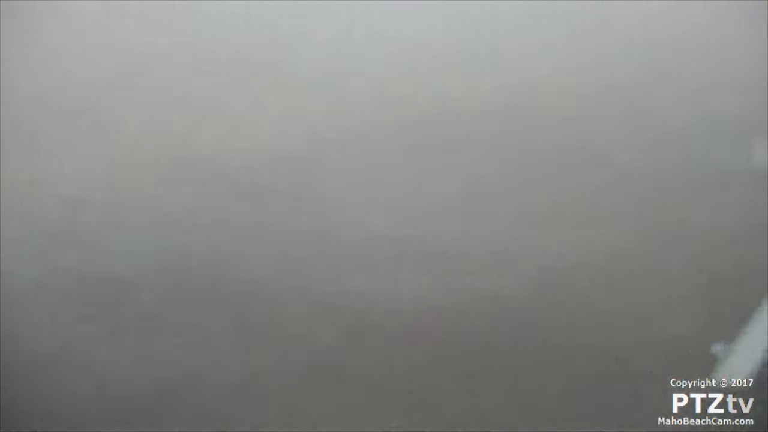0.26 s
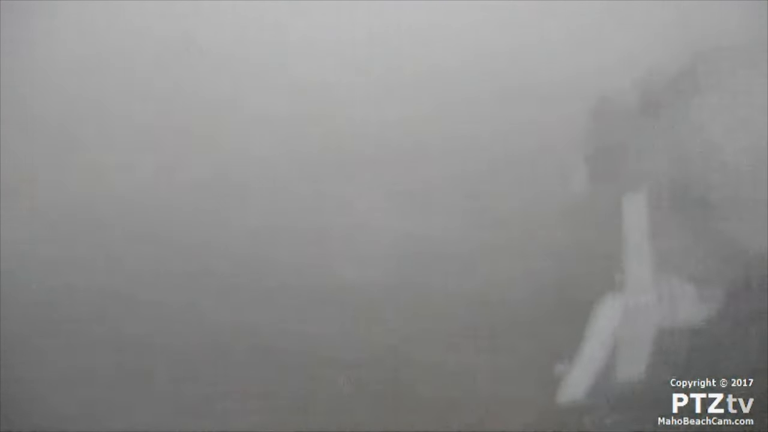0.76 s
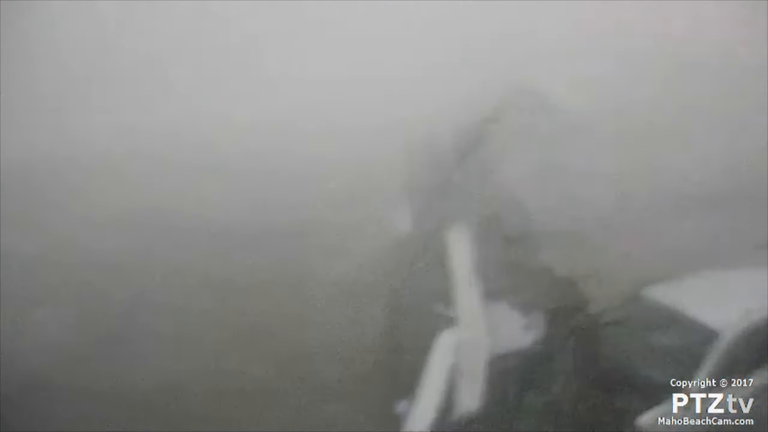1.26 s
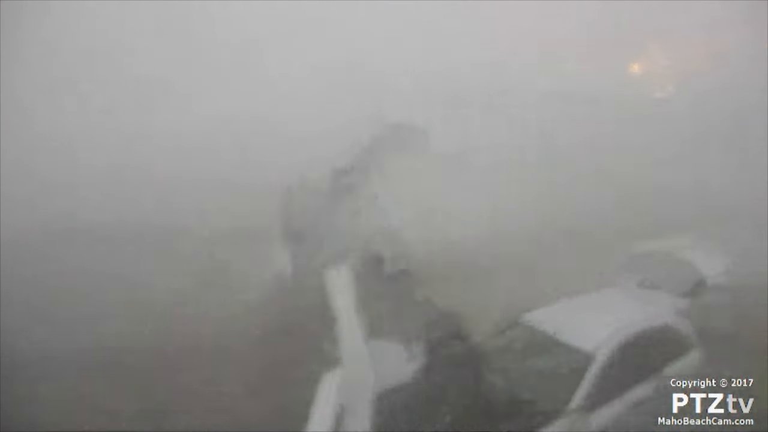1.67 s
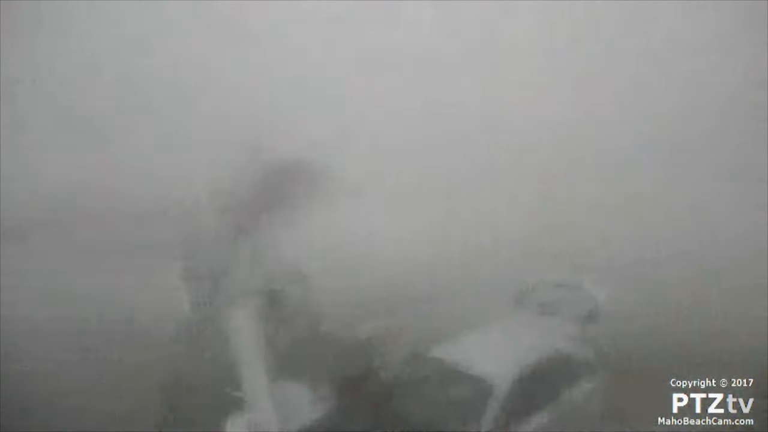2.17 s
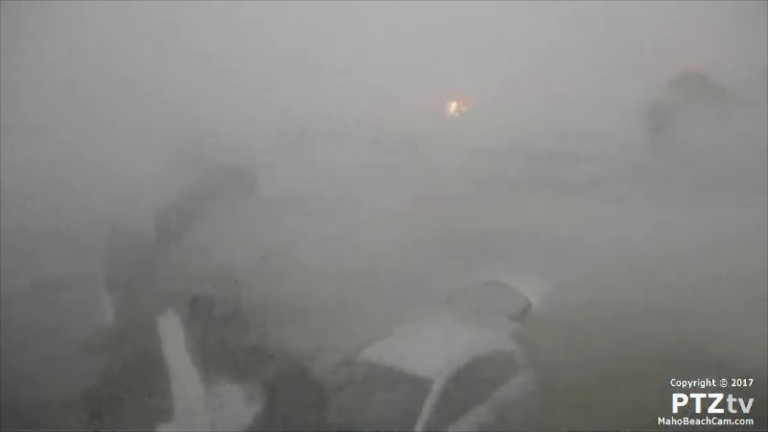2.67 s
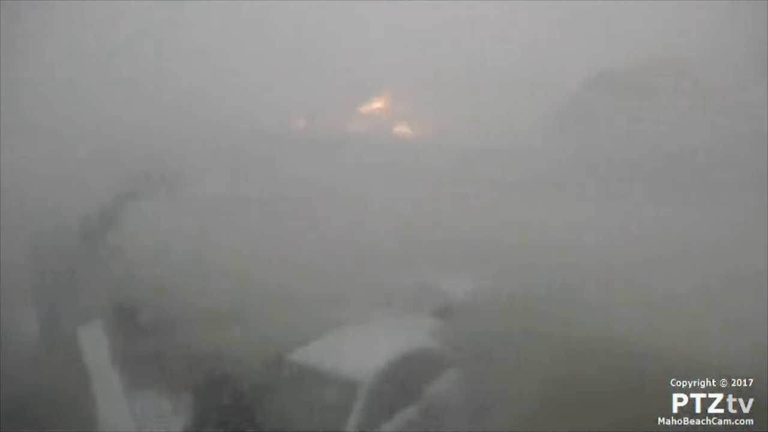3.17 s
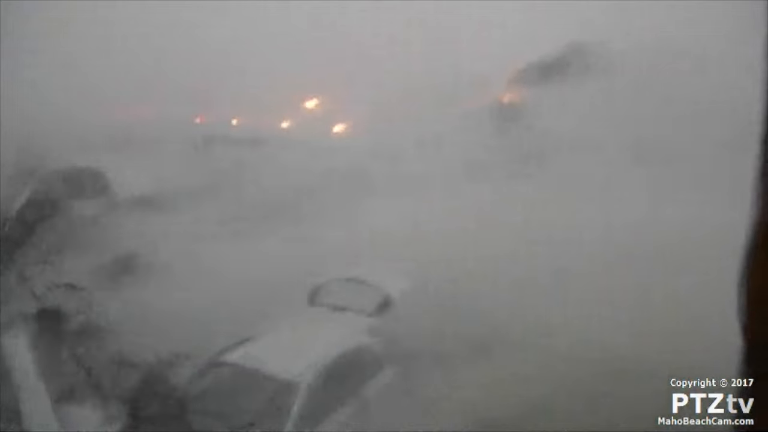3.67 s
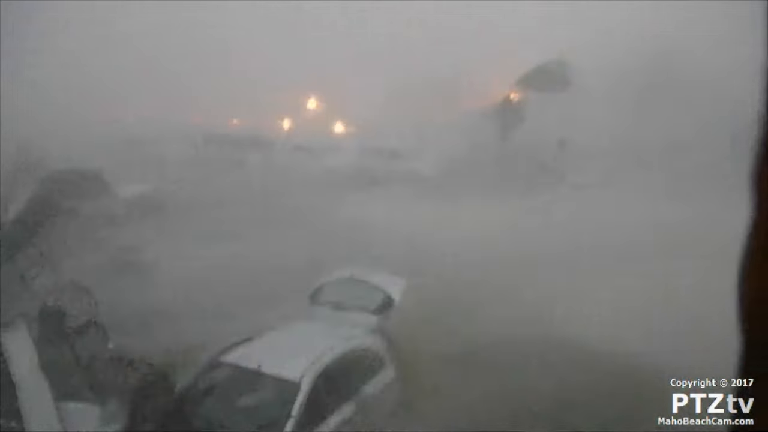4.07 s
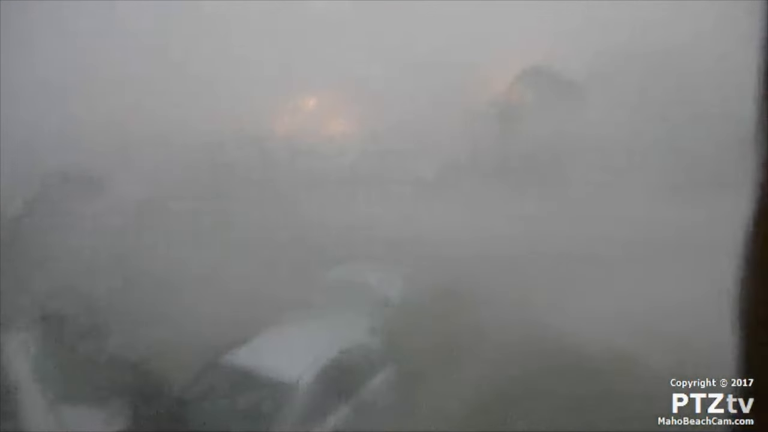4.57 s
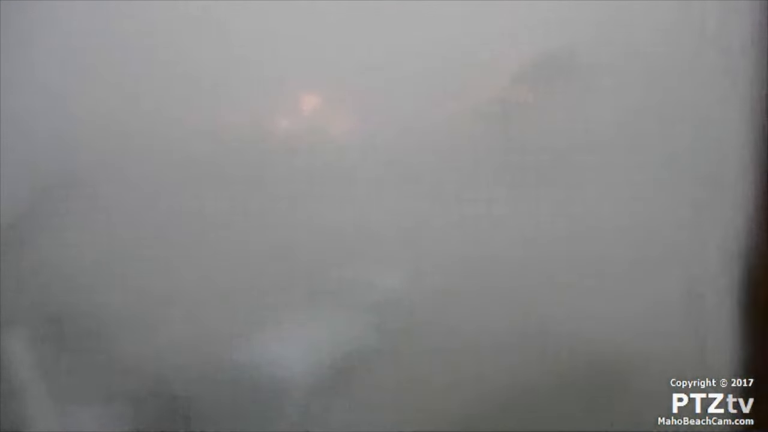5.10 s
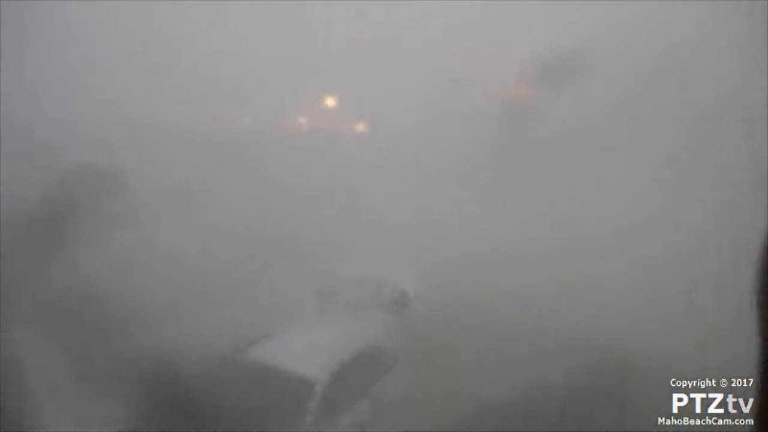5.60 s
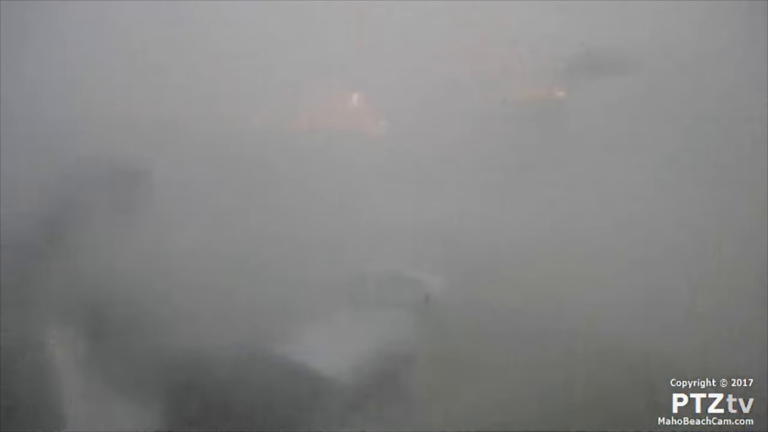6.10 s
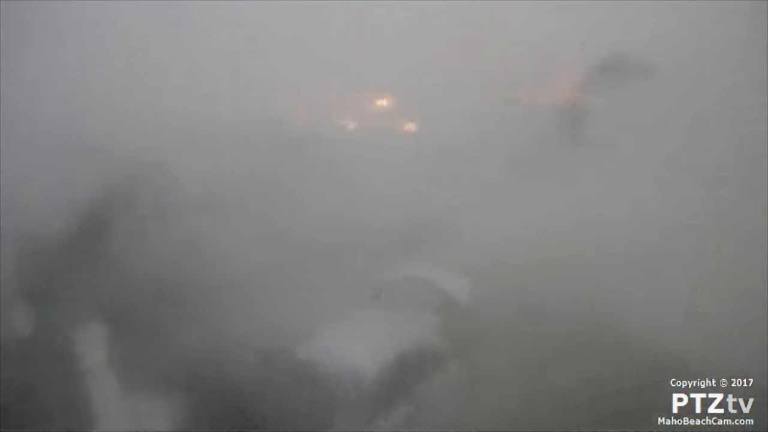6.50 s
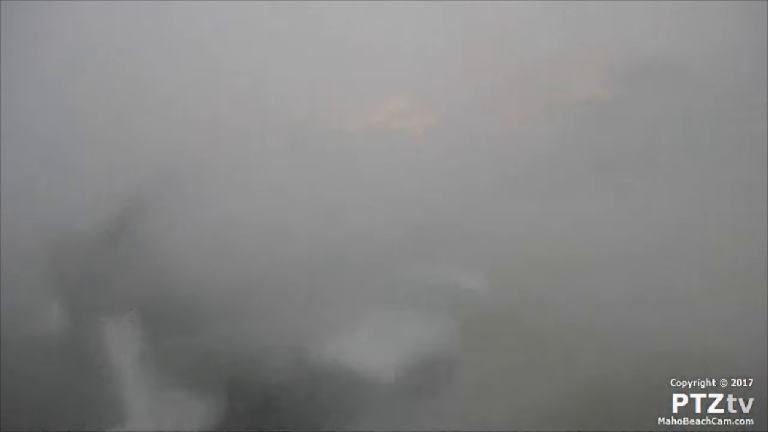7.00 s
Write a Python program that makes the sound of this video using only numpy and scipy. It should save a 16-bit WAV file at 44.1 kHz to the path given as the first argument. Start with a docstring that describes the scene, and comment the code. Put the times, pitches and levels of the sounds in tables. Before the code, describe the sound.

Violent storm gale batters a camera's microphone: low thudding rumble, a shifting hollow howl, hissing sheets of spray and fine ticking drops, all clipped.

```python
"""Hurricane at an outdoor camera

A hurricane drives sheets of rain past the camera's one microphone. Eddies buffet it with a deep rumble: noise
that is played faster in the gusts. The gale is noise with a roaring spectrum and a moving howl, and spray
spatters the housing in short ticks. Together they overload the input, which clips: the swings of the rumble
chop the roar into a harsh flutter. A fine hiss follows the treble."""
import sys
import numpy as np
from scipy import signal
from scipy.fft import rfft, irfft, next_fast_len
from scipy.io import wavfile
from scipy.ndimage import uniform_filter1d

SR = 44100
rng = np.random.default_rng(int(sys.argv[2]) if len(sys.argv) > 2 else 0)


def transcribe(u):
    """Save the signal u as a 16-bit wav file named by the first command-line argument.

    u: samples, shape (n,) or (channels, n), limited to [-1, 1]; the rate is SR.
    q: integer samples, one column per channel.
    """
    v = np.clip(np.atleast_2d(u).T, -1, 1)
    q = np.round(v * 32767).astype(np.int16)
    wavfile.write(sys.argv[1], SR, q)


N = 319725
TIME = np.arange(N) / SR
CEILING = 0.47  # largest swing that the input can pass
EDGE_HZ = 6950

# single gusts that strike the microphone; negative values lower the level
# columns: middle_s, length_s (width at half height), buffeting_db (added), roar_db (added)
GUSTS = [(1.258, .13, 9, 3.5), (1.601, 0.0811, 2.5, -1.5), (2.221, 0.061, 2.5, 3.5),
         (2.609, 0.0495, 4, 1.5), (2.697, 0.0895, 3, 2.5), (3.224, .06, 3, 2), (4.041, .08, 4, 3),
         (4.535, 0.072, 2.5, 3.5), (5.213, .07, 1.5, -0.5), (5.928, 0.0904, 6, 1.5),
         (7.107, .06, 2.5, -2.5)]
# slow course of the storm at the microphone, levels before the trims
# columns: time_s, buffeting_db, roar_db, brightness_db_per_octave (from spray)
STORM = [(0, -1.5, -11, -1), (.22, -1, -10.3, -0.2), (.4, -8, -13.3, -1.5), (.8, -7, -10, -0.5),
         (1.12, -6.5, -9.5, 0), (1.72, -3, -5, -0.2), (2.0, -6.5, -8.5, 0.8), (2.7, -5, -6.5, 1.86),
         (3.3, -6.5, -6, 1), (3.55, -7, -7.5, 0), (4.3, -7, -12.5, 1.2), (5.2, -6, -11.5, -0.5),
         (5.45, -11.5, -14, .3), (6.15, -12, -10.7, 3.5), (6.55, -12.5, -13.5, 1.8),
         (7.25, -11.5, -11.5, 0.8)]


def buffeting(hurry=.12, trim_db=-0.26, steady_s=0.18, lumpy_db=1.0, lumpy_hz=8):
    """Eddies press on the microphone; a stronger gust carries them past faster, which lifts the rumble."""
    # spectrum of the eddies on the microphone in an average gust
    # columns: frequency_hz, density_db (relative, per Hz)
    eddy_spectrum = [(20, -24), (45, -12.5), (70, -3.5), (100, 0.9), (140, -1.8), (190, -6.5), (235, -8),
                     (285, -13), (340, -14.5), (500, -19), (1200, -43)]
    gusts_db = swells([(middle, length, db) for middle, length, db, _ in GUSTS], TIME)
    strength_db = follow(STORM, TIME)[0] + gusts_db + lumpy_db * wander(lumpy_hz)

    def response(hz):
        return gain_of(read(eddy_spectrum, hz)) / (1 + (hz / 1500) ** 2)

    eddies = filtered(rng.standard_normal(N), response)
    # read the noise faster where the wind is stronger
    travel = np.cumsum(gain_of(hurry * strength_db))
    eddies = np.interp(travel / travel[-1], TIME / TIME[-1], eddies)
    # even out the chance swells, so that the gusts set the level
    power = uniform_filter1d(eddies ** 2, max(int(steady_s * SR), 1))
    eddies /= np.sqrt(power + 1e-12)
    return eddies * gain_of(strength_db + trim_db)


def gale(howl_octaves=0.34, howl_db=4.5, spray_tilt=.6, patchy_db=1.48, flutter_db=1.07, flutter_hz=40,
         trim_db=-0.42, shimmer_db=.5, shimmer_hz=9):
    """Wind and rain roar; a broad howl rides up and down, and sheets of spray make it louder and brighter."""
    # spectrum of wind and rain
    # columns: frequency_hz, density_db (relative, per Hz)
    roar_spectrum = [(100, -4), (350, 0), (580, 0.1), (820, 2), (1250, 0.14), (1600, -0.7), (1950, 0.36),
                     (2500, -6.5), (2900, -6.5), (3400, -6.5), (4200, -16), (5000, -15.5), (5800, -20.5),
                     (7000, -21.5)]
    # pitch of the howl within the roar
    # columns: time_s, centre_hz
    howl_course = [(0, 1210), (.75, 1604), (1.1, 1453), (1.45, 1850), (2.1, 1900), (2.3, 1590), (2.5, 978),
                   (2.8, 1047), (3.3, 1840), (3.6, 1594), (3.9, 1240), (5.1, 1340), (6.1, 1240),
                   (7.25, 1395)]
    hop = 128  # samples from one spectral frame to the next
    frame_s = np.arange(N // hop + 5) * hop / SR
    bin_hz = np.fft.rfftfreq(4 * hop, 1 / SR)

    # dB per octave; spray_tilt is the share of it for each dB of spray
    brightness = follow(STORM, frame_s)[2] + spray_tilt * spray(frame_s)
    brightness += shimmer_db * np.interp(frame_s, TIME, wander(shimmer_hz))
    howl_hz = follow(howl_course, frame_s)[0][:, None]
    real, imag, patches = rng.standard_normal((3, len(frame_s), len(bin_hz)))
    # chance patches, smoothed over time and then over frequency
    patches = uniform_filter1d(patches, size=16, axis=0)
    patches = evened(uniform_filter1d(patches, size=4, axis=1))

    tilt_db = brightness[:, None] * np.log2((bin_hz + 100) / 1500)
    field_db = read(roar_spectrum, bin_hz) + tilt_db + patchy_db * patches
    octaves_off = np.log2((bin_hz + 1) / howl_hz)
    field_db += howl_db * np.exp(-(octaves_off / howl_octaves) ** 2)
    shape = gain_of(field_db) * (bin_hz < EDGE_HZ + 500)
    shape /= np.linalg.norm(shape, axis=1, keepdims=True)  # colour leaves the strength alone
    noise_frames = (shape * (real + 1j * imag)).T
    roar = signal.istft(noise_frames, nperseg=4 * hop, noverlap=3 * hop)[1][:N]

    gusts_db = swells([(middle, length, db) for middle, length, _, db in GUSTS], TIME)
    strength_db = follow(STORM, TIME)[1] + gusts_db + spray(TIME)
    return evened(roar) * gain_of(strength_db + trim_db + flutter_db * wander(flutter_hz))


def spray(t):
    """How much thicker or thinner than usual the rain drives, in dB of roar."""
    # sheets of rain that sweep past the microphone
    # columns: middle_s, length_s (width at half height), rise_db
    sheets = [(.12, 0.037, 5), (.57, 0.07, 2), (1.32, .06, 1), (1.46, .08, 0.5), (2.49, .07, 0.5),
              (2.79, .06, 0.5), (4.45, .07, 1), (5.34, .07, 2), (5.76, 0.07, 1.5), (6.01, .08, 1),
              (6.73, .1, 0.6), (6.96, .05, 1.5), (7.17, 0.076, 4)]
    # brief lulls between the sheets
    # columns: middle_s, length_s (width at half height), drop_db
    lulls = [(1.55, .07, 3), (2.39, 0.086, 1.5), (2.94, 0.11, 2.1), (3.39, .05, 1.4), (4.54, 0.092, 5),
             (5.42, 0.065, 1.5), (5.56, .1, 3.5), (5.86, .06, 2.5), (6.45, .06, 1.8), (6.86, .08, 2)]
    return swells(sheets, t) - swells(lulls, t)


def spatter(per_s=160, spread_db=5.0, level_db=-27, cycles=3.8, low_hz=1300, high_hz=6000, count=16):
    """Drops hit the housing: short dull ticks of many pitches, a few of them large."""
    size_db = spread_db * np.minimum(rng.exponential(1, N), 4)
    drops = gain_of(size_db) * (rng.random(N) < per_s / SR)
    spot = rng.integers(0, count, N)  # which pitch of tick a drop strikes
    t = TIME[:SR // 100]
    out = np.zeros(N)
    for k, hz in enumerate(np.geomspace(low_hz, high_hz, count)):
        decay = np.exp(-2 * hz * t / cycles)
        tick = (-1) ** k * np.sin(2 * np.pi * hz * t) * decay
        out += signal.oaconvolve(drops * (spot == k), tick)[:N]
    return gain_of(level_db) * evened(out)


def fizz(x, share_db=-7.5, low_hz=250, high_hz=2000, lag_s=0.043, flicker_db=1.0, flicker_hz=60):
    """A fine flickering hiss that swells and sinks with the treble of x."""
    treble = filtered(x, lambda hz: hz > 1000)
    power = uniform_filter1d(treble ** 2, max(int(lag_s * SR), 1))
    strength = np.sqrt(power + 1e-12)

    def response(hz):
        return (hz < EDGE_HZ) * hz / np.hypot(hz, low_hz) / np.hypot(hz, high_hz)

    hiss = filtered(rng.standard_normal(N), response)
    return gain_of(share_db + flicker_db * wander(flicker_hz)) * strength * evened(hiss)


def swells(rows, t, steep=2.6):
    """Sums one rounded rise and fall in dB for each row of (middle s, length s, height dB)."""
    return sum(db * .5 ** (abs(2 * (t - middle) / length) ** steep) for middle, length, db in rows)


def wander(hz):
    """Slow chance of rms one, with changes up to about hz a second."""
    return evened(filtered(rng.standard_normal(N), lambda f: 1 / (1 + (f / hz) ** 2)))


def filtered(x, response):
    """Applies a gain that is a function of frequency."""
    size = next_fast_len(N + SR // 4)
    hz = np.fft.rfftfreq(size, 1 / SR)
    return irfft(rfft(x, size) * response(hz), size)[:N]


def follow(rows, t):
    """The columns of a curve table at the times t."""
    s, *columns = np.transpose(rows)
    return [np.interp(t, s, column) for column in columns]


def read(points, hz):
    """A spectrum table on a logarithmic frequency axis."""
    table_hz, value = np.transpose(points)
    return np.interp(np.log(hz + 1), np.log(table_hz + 1), value)


def evened(x):
    """Scales to an rms of one."""
    return x / np.sqrt(np.mean(x ** 2) + 1e-20)


def gain_of(db):
    """Decibels to a factor."""
    return 10 ** (np.asarray(db) / 20)


def scene():
    """Everything that reaches the one microphone."""
    return (buffeting() + gale() + spatter())[None]


def record(dry, thin_hz=22, dull_hz=7000):
    """The input clips hard and droops at both ends; a fine hiss swells and sinks with the treble; then the band
    limit."""
    clipped = np.clip(dry[0], -CEILING, CEILING)
    clipped = filtered(clipped, lambda hz: hz / np.hypot(hz, thin_hz) / np.sqrt(1 + (hz / dull_hz) ** 4))
    band_limit = signal.firwin(1023, EDGE_HZ, window=("kaiser", 9), fs=SR)
    return signal.oaconvolve(clipped + fizz(clipped), band_limit, "same")[None]


dry = scene()
out = record(dry)
transcribe(out)
```